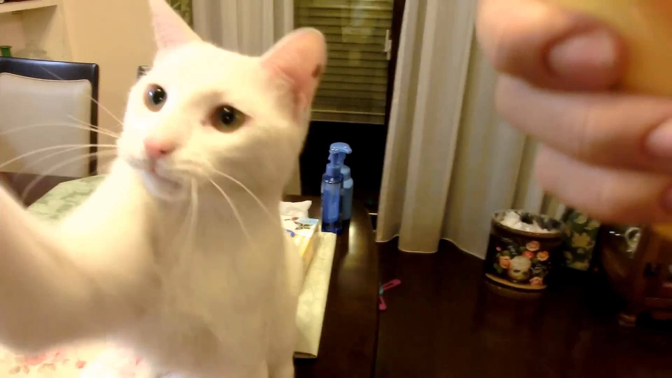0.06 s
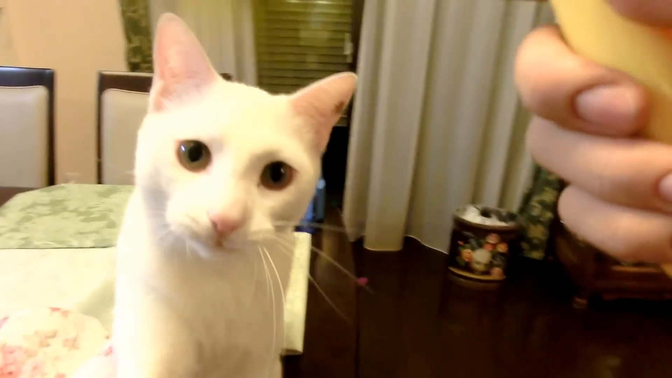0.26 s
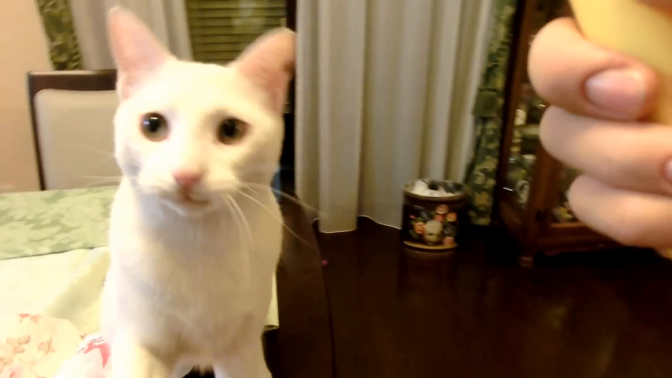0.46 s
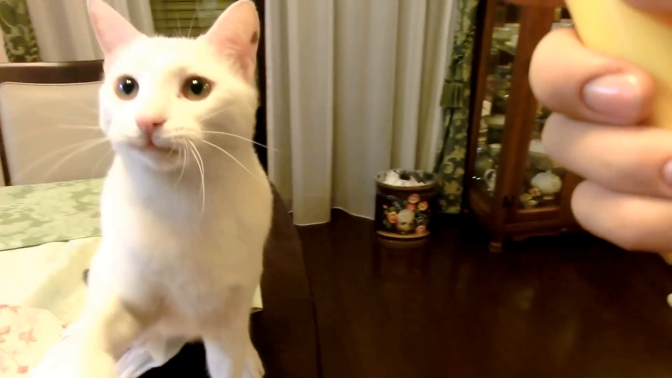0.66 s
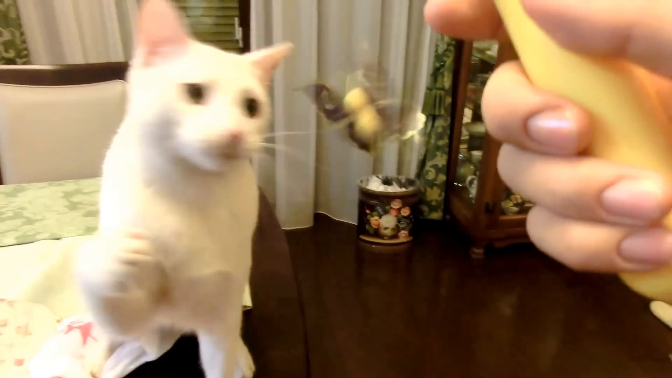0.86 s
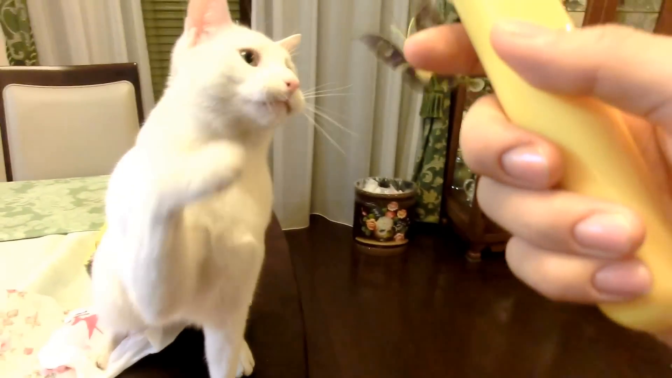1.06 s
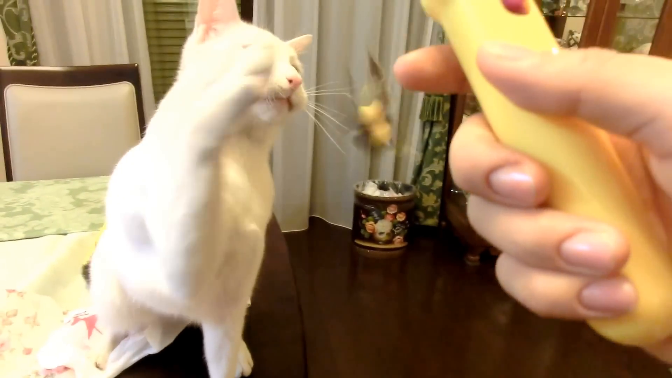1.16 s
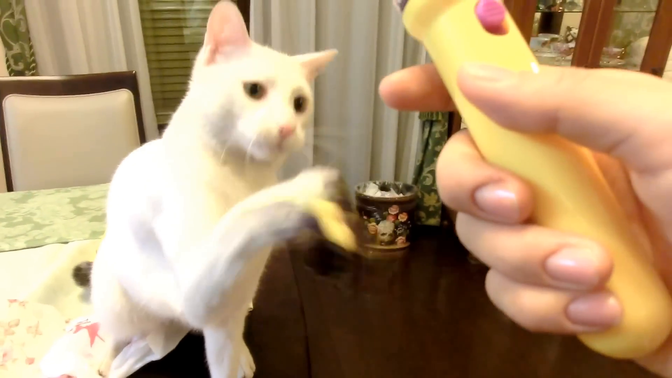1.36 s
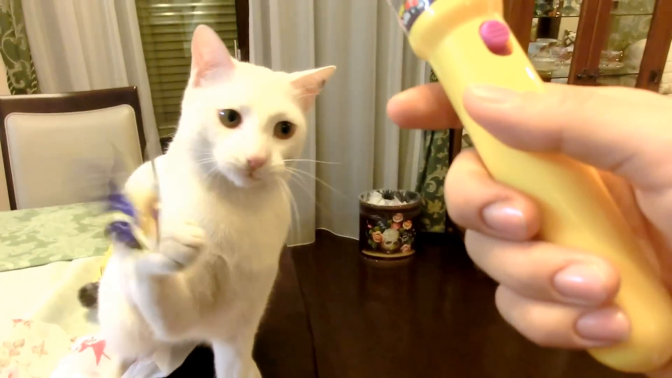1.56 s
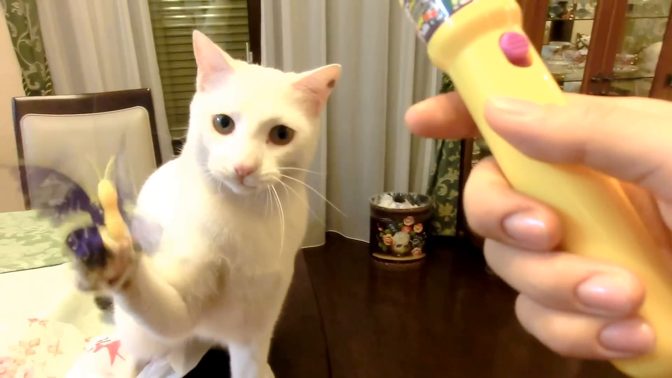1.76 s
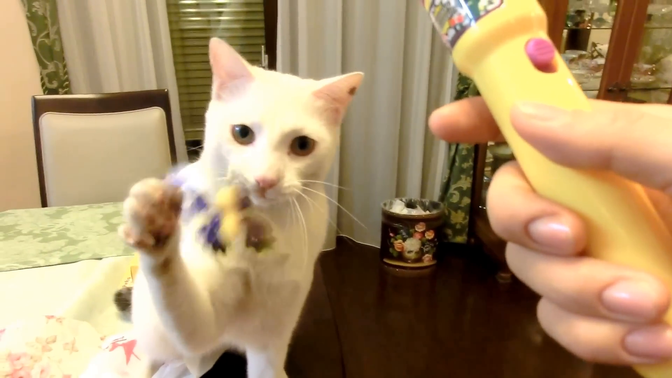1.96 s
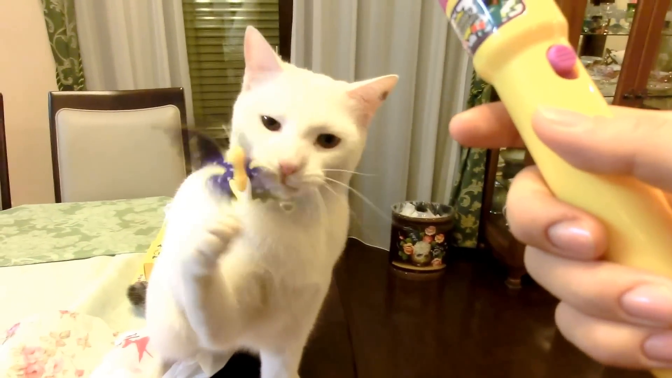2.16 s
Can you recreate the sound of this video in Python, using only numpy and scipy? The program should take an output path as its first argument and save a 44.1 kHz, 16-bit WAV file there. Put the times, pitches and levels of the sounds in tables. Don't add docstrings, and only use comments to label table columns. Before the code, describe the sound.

Fast papery fluttering of a motorised toy's plastic wings, with early microphone buffeting and one sharp knock

```python
import sys
import numpy as np
from scipy import signal
from scipy.fft import rfft, irfft
from scipy.io import wavfile

SR = 44100
rng = np.random.default_rng(int(sys.argv[2]) if len(sys.argv) > 2 else 0)


def generate_wav(signal):
    frames = np.transpose(np.atleast_2d(signal))
    scaled = np.clip(frames, -1, 1) * 32767
    pcm = np.round(scaled).astype(np.int16)
    wavfile.write(sys.argv[1], SR, pcm)


def attenuation_scalar(level_db):
    decades = np.asarray(level_db, float) / 20
    return 10 ** decades


N = 97020


def in_time(rows):
    return np.interp(np.arange(N) / SR, *np.transpose(rows))


def colour(x, *tables):
    log_hz = np.log(np.maximum(np.fft.rfftfreq(4096, 1 / SR), 5))
    curves = []
    for table in tables:
        hz, db = np.transpose(table)
        curves.append(np.interp(log_hz, np.log(np.maximum(hz, 5)), db))
    power = np.mean(attenuation_scalar(curves[0]) ** 2)
    cepstrum = irfft(np.log(attenuation_scalar(sum(curves)) / np.sqrt(power)))
    cepstrum[1:2048] *= 2
    cepstrum[2049:] = 0
    return signal.fftconvolve(x, irfft(np.exp(rfft(cepstrum))))[:N]


def drift(hz):
    pole = np.exp(-2 * np.pi * hz / SR)
    noise = rng.standard_normal(N + SR)
    slow = signal.lfilter([1], [1, -2 * pole, pole * pole], noise)[SR:]
    return slow / slow.std()


def stereo(mid, side, pan_db):
    return np.array([(mid + side) * attenuation_scalar(pan_db / 2), (mid - side) * attenuation_scalar(-pan_db / 2)])


# [f/Hz, level/dB]
ROOM_TONE = [(12, -18), (20, 10.5), (678, -6), (1090, -5), (1660, -20), (2200, -21.5), (7730, -14),
             (11800, -24.5), (16000, -42)]
# [t/s, level/dB]
STIRRING = [
    (0.58, 4),
    (0.76, 3.5),
    (0.8, -2),
    (1.4, 1.5),
    (1.55, -0.5),
    (1.65, 3.5),
    (2.2, 2.5),
]


def room():
    mid, side = (colour(noise, ROOM_TONE) for noise in rng.standard_normal((2, N)))
    gain = attenuation_scalar(-59.5 + in_time(STIRRING) + 1.42 * drift(22))
    return gain * stereo(mid, attenuation_scalar(-8.5) * side, 0.73)


# [t/s, peak level/dB, f/Hz]
BODY_TAPS = [(0.562, -42, 1580), (1.068, -49.5, 1090), (1.184, -50, 850), (1.222, -55, 1270),
             (1.623, -44.5, 1070), (1.7, -45.5, 1130), (1.762, -51, 1250), (1.873, -44, 1060),
             (1.893, -46.5, 1200), (1.929, -45.5, 930), (2.008, -48, 1080), (2.049, -44.5, 1240),
             (2.088, -49, 1060), (2.124, -45, 800)]


def taps():
    t = np.arange(N) / SR
    t60_s, attack_s, lift_db = 0.023, 0.0012, 1.5
    ring = np.zeros(N)
    for s, db, hz in BODY_TAPS:
        after = np.maximum(t - s, 0)
        envelope = attenuation_scalar(db + lift_db - 60 * after / t60_s) * np.minimum(after / attack_s, 1)
        pitch_rise = 1 + 3.6 * np.minimum(after, 0.05)
        ring += envelope * np.sin(2 * np.pi * hz * after * pitch_rise)
    return stereo(ring, attenuation_scalar(-25) * np.roll(ring, 9), 0.6)


# [t/s, rumble level/dB]
PORT_RUMBLE = [
    (0.0, -60.5),
    (0.19, -42),
    (0.212, -41),
    (0.216, -24.5),
    (0.28, -27.5),
    (0.33, -27.5),
    (0.385, -35),
    (0.455, -25),
    (0.505, -50.5),
]
# [f/Hz, level/dB]
PORT_SPECTRUM = [(12, -24), (20, -8.5), (65, -1), (462, -13), (509, -16), (1530, -22), (2000, -27),
                 (2600, -42), (4400, -120)]


def buffet():
    lumps_db = 4 * drift(54.5)
    touching = np.arange(N) < PORT_RUMBLE[-1][0] * SR
    gain = attenuation_scalar(in_time(PORT_RUMBLE) + lumps_db) * touching
    mid, side = gain * rng.standard_normal((2, N))
    return stereo(colour(mid, PORT_SPECTRUM), attenuation_scalar(-8.5) * colour(side, PORT_SPECTRUM), 1.1)


# [f/Hz, level/dB, t60/s]
CASE_MODES = [(2400, -18, 0.0052), (2860, -4.5, 0.013), (4080, -7, 0.017), (4700, -4.5, 0.013),
              (6200, -11, 0.017), (7430, 3.5, 0.0054), (8700, 10, 0.0024), (11500, -31, 0.0074)]


def knock():
    knock_s, ring_db, push_db, push_s = 0.2754, -3.5, -12, 0.00294
    t = np.arange(N) / SR - knock_s
    after = np.maximum(t, 0)
    rings = np.zeros(N)
    for hz, db, t60 in CASE_MODES:
        rings += attenuation_scalar(db - 60 * after / t60) * np.sin(2 * np.pi * hz * after)
    push = -attenuation_scalar(push_db) * np.exp(-((t + push_s / 2) / push_s) ** 2)
    side = 1.4 * attenuation_scalar(ring_db) * np.gradient(rings)
    return stereo(attenuation_scalar(ring_db) * rings + push, side, 1.4)


def crinkle(size):
    clicks = rng.random(size) < 20000 / SR
    uneven = attenuation_scalar(3 * np.minimum(rng.exponential(1, size), 4))
    x = clicks * uneven * rng.standard_normal((2, size))
    return x / x.std()


# [t/s, level/dB]
FILM_RUSTLE = [
    (0.0, -44),
    (0.31, -41),
    (0.42, -53.5),
    (0.92, -53.5),
    (1.24, -51.5),
    (1.41, -54),
    (1.65, -53),
    (1.83, -46),
    (2.2, -52),
]


def rustle():
    gain = attenuation_scalar(in_time(FILM_RUSTLE) - 6 + 2 * drift(82))
    return gain * (0.79 * rng.standard_normal((2, N)) + 0.8 * crinkle(N))


def burst(t, length, rise):
    fall = np.exp(-np.maximum(t - rise, 0) / max(length, 2e-4))
    return np.minimum(t / rise, 1) * fall


def snap(db, hz, length, rise):
    t = np.arange(SR // 20) / SR
    head = burst(t, length - rise / 2, rise)
    tail = attenuation_scalar(-15) * burst(t, 0.0095, rise)
    x = (head + tail) * crinkle(len(t))
    x = signal.lfilter(*signal.butter(1, 0.3 * hz, "high", fs=SR), x)
    r = np.exp(-np.pi * 0.18 * hz / SR)
    poles = [1, -2 * r * np.cos(2 * np.pi * hz / SR), r * r]
    peak = signal.lfilter([(1 - r * r) / 2, 0, (r * r - 1) / 2], poles, x)
    x = x + attenuation_scalar(1.5) * peak
    same_energy = np.sqrt(np.sum(head ** 2) / np.sum(x[0] ** 2))
    return attenuation_scalar(db + 2.5) * x * same_energy


# [t/s, peak level/dB,
# brightest f/Hz, crackle length/s]
NEAR_SNAPS = [(0.0004, -25.5, 2414, 0.00079), (0.03, -32, 4660, 0.00062), (0.0342, -24.5, 8600, 0.00098),
              (0.046, -34, 2280, 0.0014), (0.073, -31, 6700, 0.0008), (0.0765, -26, 8700, 0.00091),
              (0.0895, -40, 3060, 0.0037), (0.1, -44, 7800, 0.0014), (0.1118, -26.4, 7350, 0.0023),
              (0.1158, -34.5, 3220, 0.0033), (0.1312, -28, 7360, 0.0034), (0.157, -28, 5860, 0.0028),
              (0.1947, -27.5, 11500, 0.0014), (0.2162, -14, 5860, 0.002), (0.23, -30.5, 2080, 0.0049),
              (0.2398, -15.5, 13200, 0.005), (0.245, -16.5, 11700, 0.00067), (0.2639, -22, 3700, 0.00089),
              (0.2696, -25, 5000, 0.00027), (0.2743, -7, 2450, 0.0013), (0.281, -30, 11300, 0.0014),
              (0.2886, -33, 2600, 0.0007), (0.2967, -19.5, 4130, 0.0018), (0.3055, -40.5, 10600, 0.014),
              (0.3186, -14.5, 4400, 0.0003), (0.3247, -20.4, 2070, 0.00398), (0.334, -25, 5130, 0.0027),
              (0.3542, -18.5, 5030, 0.0031), (0.357, -21, 3800, 0.0033), (0.383, -20.5, 2760, 0.002),
              (0.3871, -15.5, 3680, 0.00056), (0.3907, -24.5, 10800, 0.0013), (0.3955, -29, 5250, 0.0024),
              (0.406, -17, 10300, 0.00052), (0.4149, -15, 2920, 0.0012), (0.425, -18, 4700, 0.0019),
              (0.428, -41, 10100, 0.0011), (0.4344, -54, 7600, 0.0019), (0.4471, -20, 8700, 0.002),
              (0.4514, -23, 2920, 0.0024), (0.4591, -21, 10000, 0.0012), (0.4622, -24, 7240, 0.002),
              (0.4663, -27.3, 4100, 0.0027), (0.476, -47, 7400, 0.0017)]
# [t/s, peak level/dB, brightest f/Hz, crackle length/s]
MORE_CRACKLES = [
    (0.348, -31, 8800, 0.0066),
    (0.384, -30.5, 9000, 0.0018),
    (0.668, -40, 8500, 0.013),
    (0.706, -41, 5130, 0.013),
]
# [t/s, peak level/dB, brightest f/Hz, crackle length/s]
FREE_SNAPS = [(0.5007, -37, 5900, 0.0018), (0.5058, -39, 8500, 0.0012), (0.52, -40, 7540, 0.0016),
              (0.541, -43, 4600, 0.0016), (0.5452, -39.5, 2540, 0.0022), (0.5777, -46.6, 3420, 0.0028),
              (0.5855, -31.5, 8750, 0.0011), (0.6186, -33, 5650, 0.00033), (0.6217, -30, 8500, 0.0018),
              (0.6347, -43, 8800, 0.0057), (0.661, -28, 9200, 0.0012), (0.699, -33, 7540, 0.0019),
              (0.7346, -33, 9800, 0.0042), (0.7734, -41.4, 6200, 0.0019), (0.787, -48.5, 2580, 0.0033),
              (0.81, -42, 6050, 0.00068), (0.8166, -38.5, 5900, 0.0021), (0.848, -42.5, 9800, 0.0013),
              (0.8534, -41.5, 10000, 0.0023), (0.8938, -33, 6700, 0.0018), (0.9156, -44, 9000, 0.00056),
              (0.9323, -31, 10800, 0.0009), (0.9444, -52, 8400, 0.0019), (0.9723, -33.5, 11000, 0.00073),
              (0.997, -47.6, 9000, 0.00073), (1.005, -42, 9500, 0.00037), (1.01, -40.5, 7600, 0.002),
              (1.0458, -43, 4800, 0.00041), (1.0493, -40.5, 10200, 0.0011), (1.0614, -39, 2730, 0.00068),
              (1.072, -46.9, 7800, 0.0016), (1.0833, -45, 10800, 0.00072), (1.0875, -37, 10600, 0.0021),
              (1.1017, -41.5, 2650, 0.0019), (1.1255, -37.5, 11300, 0.0016), (1.1385, -43.5, 2750, 0.0024),
              (1.163, -36, 10500, 0.0003), (1.165, -37.5, 8200, 0.0018), (1.173, -43.4, 11800, 0.00077),
              (1.179, -43, 2710, 0.0015), (1.1998, -35, 4720, 0.0003), (1.2034, -40, 10800, 0.0022),
              (1.2147, -44, 6600, 0.0016), (1.239, -39.5, 6350, 0.0009), (1.2414, -44.5, 3400, 0.0021),
              (1.25, -50, 2820, 0.0017), (1.281, -42.7, 5500, 0.0021), (1.2923, -29, 4270, 0.0015)]
# [t/s, peak level/dB, brightest f/Hz, crackle length/s]
PAWED_SNAPS = [(1.3066, -32.5, 6360, 0.00093), (1.329, -40, 7700, 0.00044), (1.346, -36, 7800, 0.0028),
               (1.3595, -38.5, 4660, 0.002), (1.395, -42, 7100, 0.00066), (1.4014, -41, 11300, 0.0015),
               (1.41, -52, 7450, 0.0016), (1.4395, -39.0, 7400, 0.0037), (1.472, -48, 4700, 0.0017),
               (1.478, -42.5, 12000, 0.0016), (1.517, -49.5, 2300, 0.0018), (1.55, -54, 8100, 0.0013),
               (1.5635, -41, 3470, 0.0014), (1.578, -48.6, 10800, 0.0015), (1.588, -42, 10400, 0.0011),
               (1.605, -56, 5500, 0.0017), (1.619, -46, 2300, 0.0015), (1.6286, -43.2, 9000, 0.00028),
               (1.6392, -50, 5800, 0.0017), (1.6443, -33.7, 8650, 0.0011), (1.6575, -46, 10300, 0.0026),
               (1.678, -36, 5900, 0.00036), (1.6817, -35, 8000, 0.0016), (1.716, -33, 5300, 0.00047),
               (1.7229, -34.5, 9600, 0.0014), (1.7605, -34.0, 5830, 0.0027), (1.7939, -37.5, 7160, 0.0024),
               (1.7975, -35.5, 6200, 0.0012), (1.8345, -34.5, 3900, 0.0012), (1.852, -54, 6800, 0.0015),
               (1.873, -37.5, 7060, 0.0049), (1.9059, -39, 6200, 0.00068), (1.9102, -33, 4900, 0.0019),
               (1.9162, -38, 6300, 0.00072), (1.948, -46, 4700, 0.0011), (1.9517, -47.5, 8160, 0.0024),
               (1.9754, -42, 9000, 0.00086), (1.987, -38, 11500, 0.00088), (1.9922, -35, 7900, 0.0011),
               (2.003, -47, 7900, 0.0013), (2.0257, -37, 5600, 0.001), (2.029, -30, 12400, 0.0016),
               (2.0649, -51, 4830, 0.0012), (2.1097, -28, 3860, 0.00069), (2.1185, -42.5, 6850, 0.0038),
               (2.1425, -42, 7440, 0.0016), (2.168, -38.8, 7900, 0.0024), (2.186, -39, 4250, 0.0015)]


def snaps():
    out = np.zeros((2, N + SR))
    for s, db, hz, length in NEAR_SNAPS + MORE_CRACKLES + FREE_SNAPS + PAWED_SNAPS:
        rise = 0.6 * length
        x = snap(db, hz, length, rise)
        i = int(max(s - rise / 2, 0) * SR)
        out[:, i:i + x.shape[1]] += x
    return out[:, :N]


# [f/Hz, level/dB]
WING_SPECTRUM = [(590, -11.5), (1000, -2), (1730, -7.5), (2280, 1.5), (2740, -2), (4520, -2), (9600, -2.5),
                 (14800, -8.5), (16400, -23)]
# [f/Hz, side minus mid level/dB]
WING_WIDTH = [(60, -10), (240, -3), (950, -20), (3770, -13), (15000, 1)]


def wings():
    mid, side = snaps() + rustle()
    return stereo(colour(mid, WING_SPECTRUM), colour(side, WING_SPECTRUM, WING_WIDTH), 0.5)


def scene():
    return room() + taps() + buffet() + knock() + wings()


def roll_off(x):
    return signal.sosfilt(signal.butter(12, 16100, fs=SR, output="sos"), x)


def record(dry):
    mix = np.clip(dry, -1, 1)
    return roll_off(mix)


dry = scene()
out = record(dry)
generate_wav(out)
```